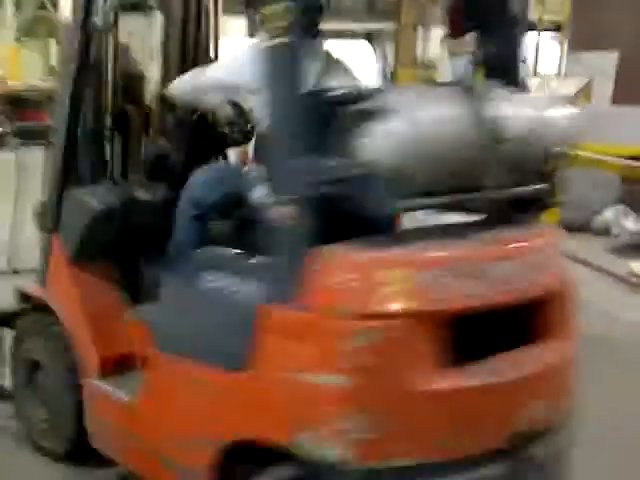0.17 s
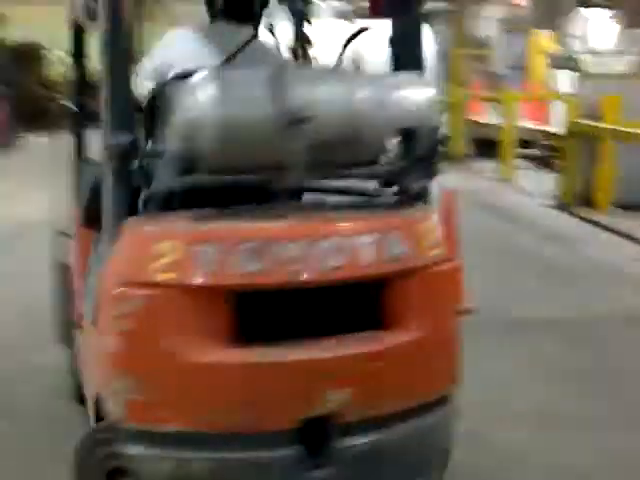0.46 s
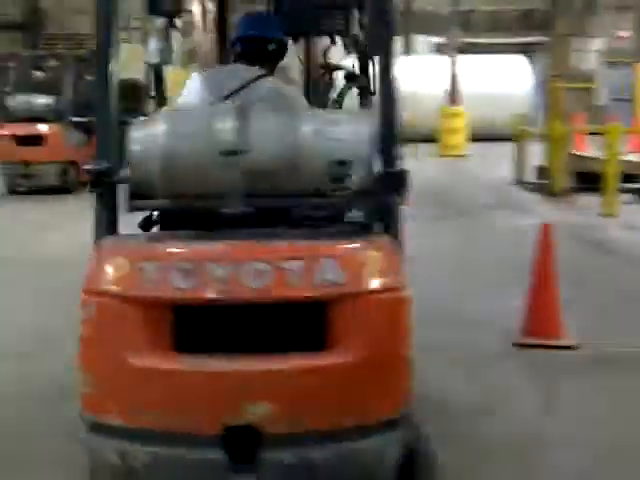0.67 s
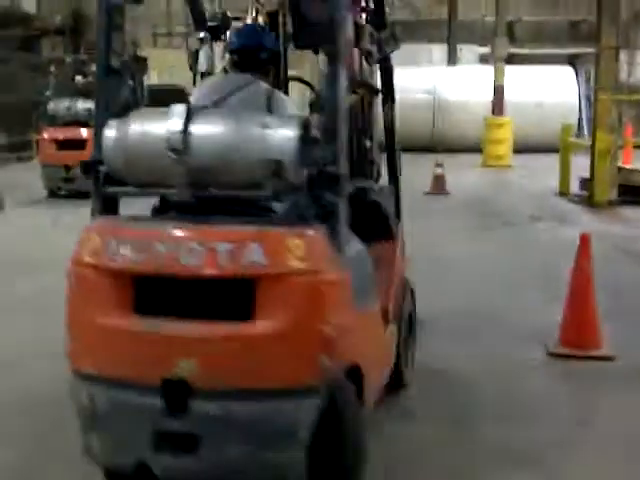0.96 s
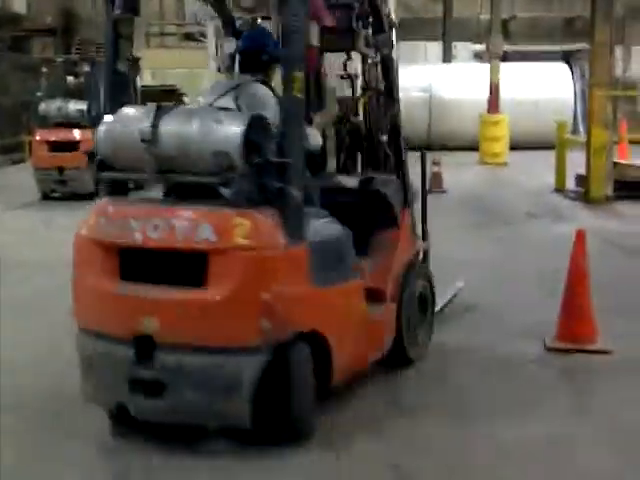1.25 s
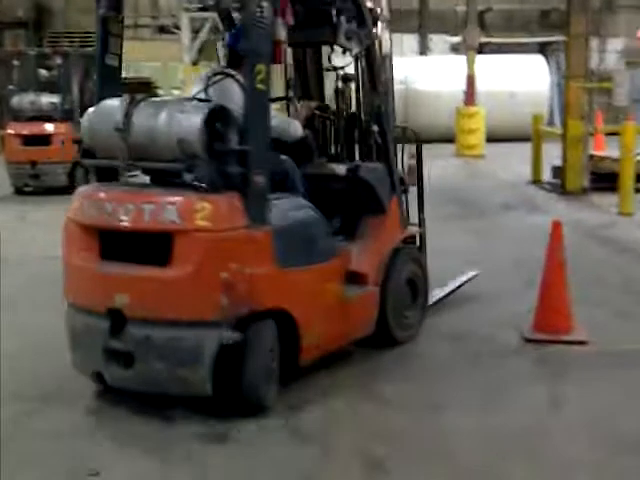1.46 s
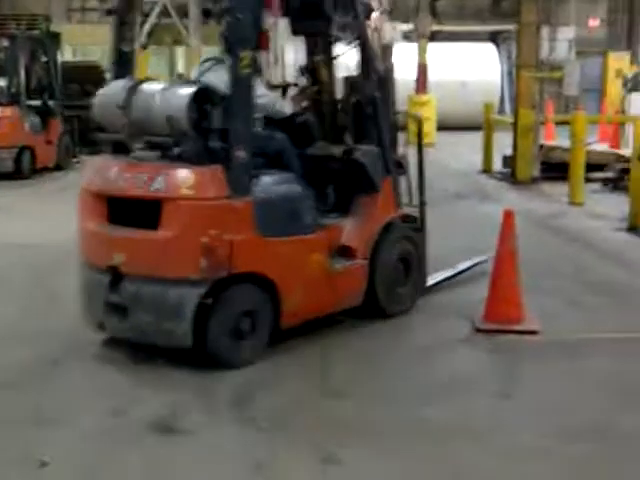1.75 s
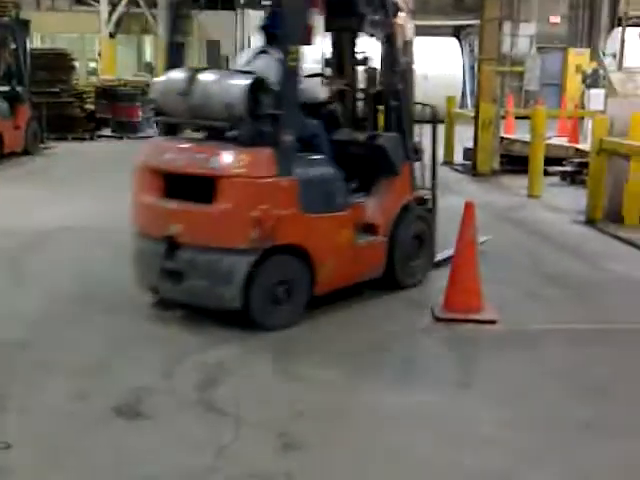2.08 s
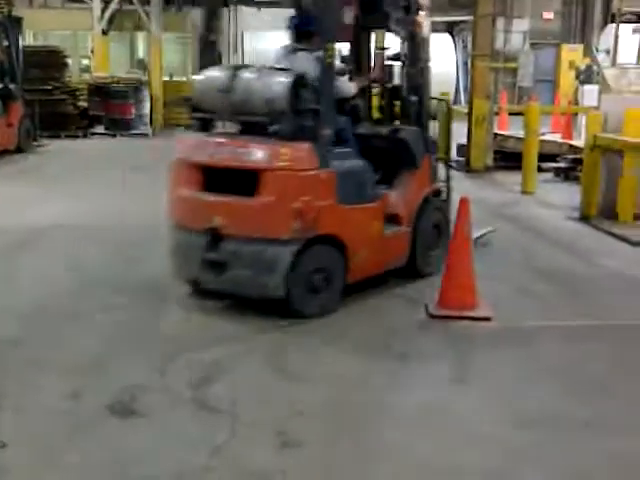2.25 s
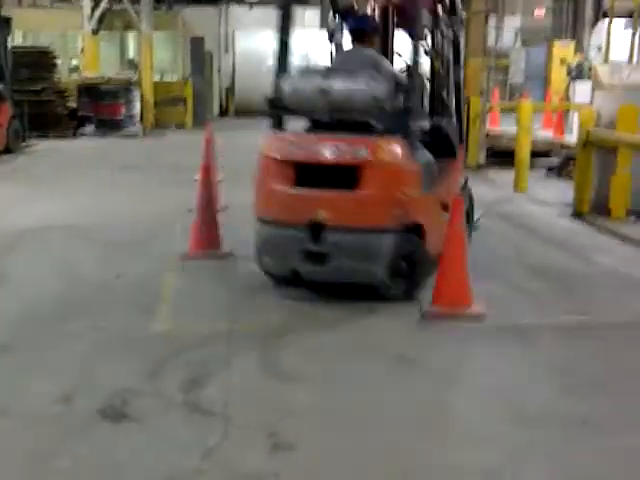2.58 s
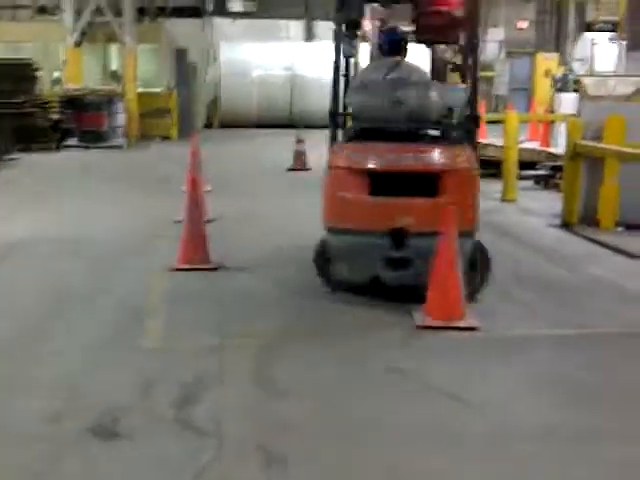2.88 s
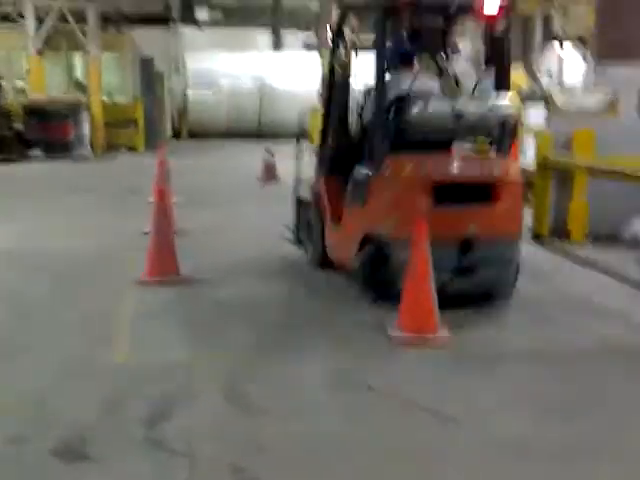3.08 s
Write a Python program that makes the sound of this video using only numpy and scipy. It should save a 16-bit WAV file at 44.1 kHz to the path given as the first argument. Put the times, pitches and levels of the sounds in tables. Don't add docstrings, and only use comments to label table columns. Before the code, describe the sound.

Close forklift engine roar with brief gear whine and a heavy metal knock, easing off after a second as the truck turns away; low wavering machine hums fill the large hall, dull small-microphone sound, one tick.

```python
import sys
import numpy as np
from scipy import signal
from scipy.io import wavfile
from scipy.ndimage import uniform_filter1d

SR = 44100
rng = np.random.default_rng(int(sys.argv[2]) if len(sys.argv) > 2 else 0)


def output_pcm(signal):
    pcm = np.clip(np.atleast_2d(signal).T, -1, 1) * 32767
    wavfile.write(sys.argv[1], SR, np.round(pcm).astype(np.int16))


def nominal_scale(level):
    x = np.asarray(level, float) / 20
    return 10 ** x


N = 142002
TIME = np.arange(N) / SR

# (t/s, firing rate f/Hz, exhaust level/dB, nearness of its roar/dB)
ENGINE = [(0, 47, -35, -4), (.12, 50.4, -32, -2.5), (.28, 52.54, -31.5, -4.5), (.45, 52.89, -32, -2.5),
          (.6, 53.01, -30, -1.5), (.8, 52.5, -33.5, -4), (.95, 52.3, -35.5, -3), (1.07, 52.25, -39.5, -3.5),
          (1.19, 51.5, -37.5, -4.5), (1.27, 45.34, -48, -7.5), (1.4, 44, -45, -8.5),
          (1.63, 41.1, -44.5, -8.5), (1.75, 40.5, -51, -7), (2.1, 40.4, -46.5, -9.5), (2.4, 40.3, -53, -8),
          (2.6, 39.1, -50.5, -11.5), (2.85, 38.1, -49.5, -9.5), (3.22, 39.2, -61, -11)]


def evened(x):
    return x / np.sqrt(np.mean(x ** 2) + 1e-20)


def along(table, column):
    columns = np.transpose(table)
    return np.interp(TIME, columns[0], columns[column])


def tone(hz):
    turns = np.cumsum(hz * np.ones(N)) / SR + rng.random()
    return np.sqrt(2) * np.sin(2 * np.pi * turns)


def fuzzy(hz, width_hz):
    r = np.exp(-np.pi * max(width_hz, .3) / SR)
    z = np.array([1, 1j]) @ rng.standard_normal((2, N + SR))
    z = signal.lfilter([1], [1, -2 * r, r * r], z)[SR:]
    carrier = np.exp(2j * np.pi * np.cumsum(hz * np.ones(N)) / SR)
    return evened((z * carrier).real)


def unsteady(hz, share=.24, width_hz=10):
    return tone(hz) + share * fuzzy(hz, width_hz)


def roar(colour, patchy_db):
    frames, hz = N // 512 + 6, np.fft.rfftfreq(2048, 1 / SR)
    a, b, patches = rng.standard_normal((frames, 1025, 3)).T
    patches = uniform_filter1d(patches, size=6, axis=0, mode="wrap")
    patches = evened(uniform_filter1d(patches, size=9, axis=1, mode="wrap"))
    f, db = np.transpose(colour)
    level_db = np.interp(np.log(hz + 1), np.log(f), db, left=-60)[:, None]
    z = (a + 1j * b) * nominal_scale(level_db + patchy_db * patches)
    sound = signal.istft(z, nperseg=2048, noverlap=1536)[1]
    return evened(sound[1024:N + 1024])


def exhaust():
    # (multiple of the firing rate, level/dB)
    overtones = [(1, -3), (2, 0.5), (3, -5), (4, -24.5), (5, -13)]
    hz = along(ENGINE, column=1)
    beat = sum(nominal_scale(db) * unsteady(k * hz, share=.2, width_hz=12) for k, db in overtones)
    return beat * nominal_scale(along(ENGINE, column=2))


def wall_boom():
    # (t/s, level/dB)
    echo = [(0, -53.5), (1.2, -49), (1.4, -43.5), (1.6, -47.5), (1.9, -43.5), (2.1, -40.5), (2.25, -40.5),
            (2.45, -39), (2.7, -37.5), (2.85, -44.5), (3.0, -38), (3.22, -41)]
    return nominal_scale(along(echo, column=1)) * unsteady(3 * along(ENGINE, column=1))


def engine_roar():
    # (f/Hz, level per Hz/dB)
    colour = [(40, -13), (120, 2), (350, 1), (470, -2.5), (1600, -3), (2300, -19.5), (4500, -20.5),
              (7000, -27.5)]
    chuff = 1 + .05 * tone(along(ENGINE, column=1))
    return nominal_scale(-27 + along(ENGINE, column=3)) * chuff * roar(colour, patchy_db=1.2)


def pump():
    peak_s, spread_s = 0.29, 0.21
    swell = np.exp(-((TIME - peak_s) / spread_s) ** 2)
    return nominal_scale(-33) * swell * tone(7.4 * along(ENGINE, column=1))


def gears():
    # (t/s, f/Hz, level/dB)
    whine = [(0, 1919, -50), (.3, 1942, -46.5), (.5, 1974, -44), (.7, 1978, -46), (.8, 1836, -43),
             (.95, 1770, -61.5), (1.2, 1713, -58), (3.22, 1725, -64)]
    fade_s = 0.4
    grind = nominal_scale(-33) * np.exp(-(TIME / fade_s) ** 2) * fuzzy(1580, width_hz=450)
    return grind + nominal_scale(along(whine, column=2)) * fuzzy(along(whine, column=1), width_hz=25)


def fan_air():
    # (f/Hz, level per Hz/dB)
    hiss = [(1800, -11), (3000, 2), (4500, 1.5), (7000, -9)]
    fade_s = 0.1
    return nominal_scale(-40) * np.exp(-(TIME / fade_s) ** 2) * roar(hiss, patchy_db=0.0)


def forks():
    # (t/s, level/dB, ringing f/Hz; minus = first swing inward)
    knocks = [
        (.0832, -19, -280),
        (.0895, -14, 300),
        (.0966, -10, 125),
        (.0968, -17, 420),
        (.1004, -12, -260),
    ]
    die_away_s = .022
    out = np.zeros(N)
    for s, db, hz in knocks:
        t = np.maximum(TIME - s, 0)
        out += nominal_scale(db - 60 * t / die_away_s) * np.sin(2 * np.pi * hz * t)
    return signal.lfilter(*signal.butter(2, 60, "high", fs=SR), out)


def rattles():
    # (t/s, level/dB, length/s, middle f/Hz)
    shakes = [
        (.41, -42, .03, 2626),
        (.48, -44.5, 0.023, 3460),
        (.555, -48, .04, 4050),
        (.57, -49, 0.029, 2900),
        (0.618, -53, .02, 3600),
        (.71, -51.5, .02, 4320),
        (.8, -41, .03, 2210),
        (0.872, -56.5, 0.026, 3320),
    ]
    out = np.zeros(N)
    for s, db, length_s, hz in shakes:
        out += nominal_scale(db) * np.exp(-((TIME - s) / length_s) ** 2) * fuzzy(hz, width_hz=1100)
    return out


def plant_hums():
    # (t/s, level/dB)
    motor = [(0, -38), (.14, -49), (.25, -32), (.4, -34), (.58, -28), (.75, -35), (1.05, -46), (1.2, -29.5),
             (1.45, -35), (1.62, -30.5), (1.78, -31), (1.9, -34.5), (2.15, -40.5), (2.35, -41),
             (2.48, -33.5), (2.9, -36.5), (3.1, -29.5), (3.22, -27.5)]
    blower = [(0, -36), (.1, -31), (.4, -33), (.6, -44), (1.1, -40), (1.3, -39), (1.4, -29), (1.55, -40),
              (1.72, -29), (1.85, -34), (2.03, -30), (2.2, -42), (2.5, -37), (2.8, -42), (2.97, -28),
              (3.1, -39), (3.22, -38)]
    higher_hum = [(0, -36.5), (.25, -38.5), (.45, -39.5), (1.1, -42), (1.25, -37), (1.5, -45.5),
                  (1.75, -38), (2.05, -38.5), (2.2, -41), (2.45, -37), (2.6, -46), (2.9, -38.5),
                  (3.22, -42.5)]
    compressor = [(0, -43), (.4, -41), (.9, -40.5), (1.02, -32), (1.3, -39), (1.45, -37.5), (1.6, -41),
                  (1.8, -34), (2.0, -45), (2.3, -37.5), (2.5, -42), (2.75, -34.5), (2.95, -39.5),
                  (3.22, -37.5)]
    machines = ((motor, 176.6), (blower, 215.5), (higher_hum, 234.3), (compressor, 153.2))
    return sum(nominal_scale(along(table, column=1)) * unsteady(hz) for table, hz in machines)


def belt_drone():
    # (t/s, level/dB)
    belt = [(0, -49), (1.2, -44), (1.6, -42), (2.3, -43.5), (2.7, -44.5), (3.22, -42)]
    return nominal_scale(along(belt, column=1)) * fuzzy(528, width_hz=24)


def faint_tones():
    # (f/Hz, width/Hz, level/dB)
    humps = [(346.5, 55, -37.5), (542.7, 52, -40)]
    weak_tones = [(302.8, 2, -42), (322.6, 15, -46), (635, 6, -46), (1507, 3.8, -54), (190.3, 8.1, -38)]
    return sum(nominal_scale(db) * fuzzy(hz, width_hz) for hz, width_hz, db in humps + weak_tones)


def hall_roar():
    # (f/Hz, level per Hz/dB)
    hall = [(20, -17), (70, -15), (110, -8.5), (190, -3), (265, -6), (330, -5.5), (1500, -11.5),
            (7000, -45)]
    return nominal_scale(-28) * roar(hall, patchy_db=1.3)


def scene():
    truck = exhaust() + wall_boom() + engine_roar() + pump() + gears() + fan_air() + forks() + rattles()
    plant = plant_hums() + belt_drone() + faint_tones() + hall_roar()
    return (truck + plant)[None]


def lost_samples():
    skip_s, height, settle_s, lead_s = 1.07499, .21, .002, .003
    t = TIME - skip_s
    jump = height / 2 * np.sign(t) * np.exp(-abs(t) / settle_s)
    edge = signal.firwin(4095, 16000, window=("kaiser", 6), fs=SR)
    edge = edge * (np.arange(-2047, 2048) > -lead_s * SR)
    return signal.oaconvolve(jump, edge, "same")


def band_limit(x):
    return signal.sosfilt(signal.butter(12, 16200, fs=SR, output="sos"), x)


def record(dry):
    top_edge_hz = 7460
    low_pass = signal.cheby2(10, 50, top_edge_hz * 1.115, fs=SR, output="sos")
    narrow = signal.sosfiltfilt(low_pass, dry)
    narrow = signal.lfilter(*signal.butter(2, 25, "high", fs=SR), narrow)
    faint_band = nominal_scale(-97.5) * fuzzy(8600, width_hz=500)
    mix = narrow + faint_band + lost_samples()
    return band_limit(mix)


dry = scene()
out = record(dry)
output_pcm(out)
```